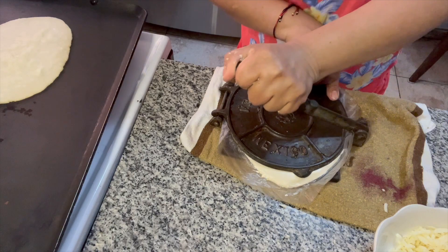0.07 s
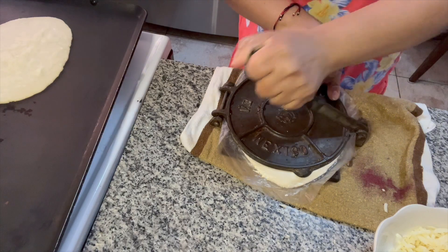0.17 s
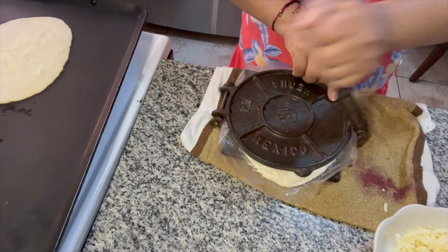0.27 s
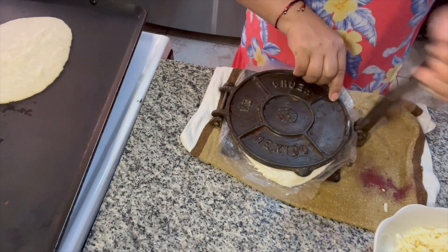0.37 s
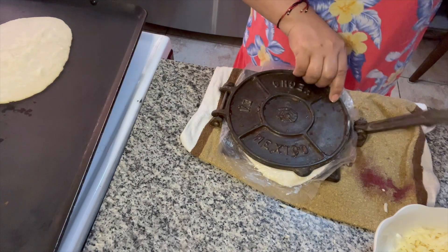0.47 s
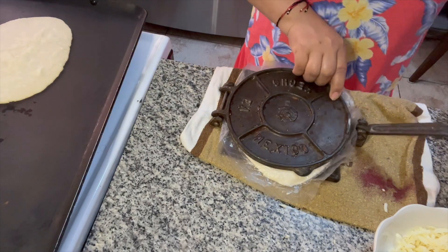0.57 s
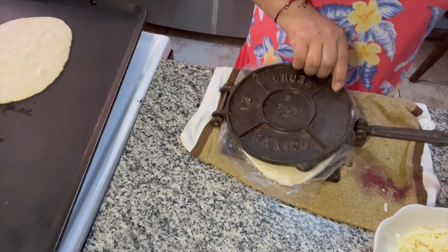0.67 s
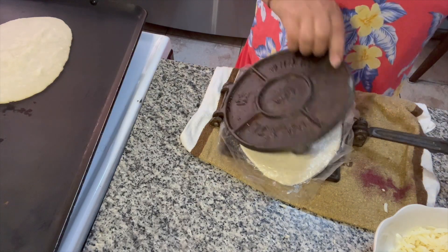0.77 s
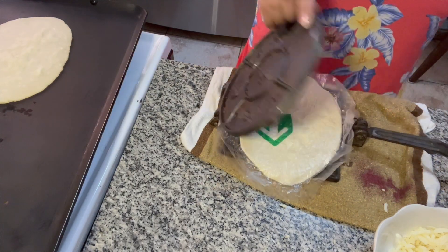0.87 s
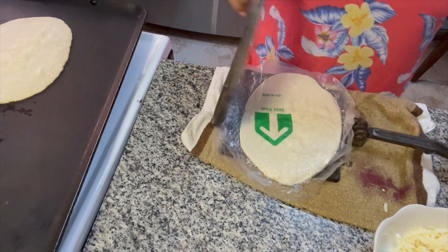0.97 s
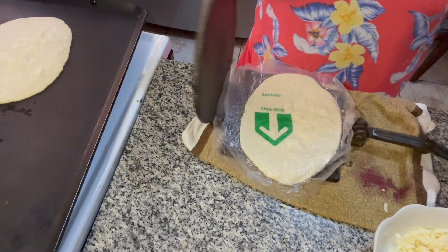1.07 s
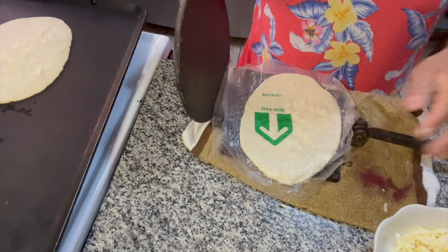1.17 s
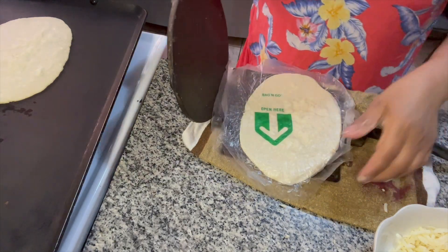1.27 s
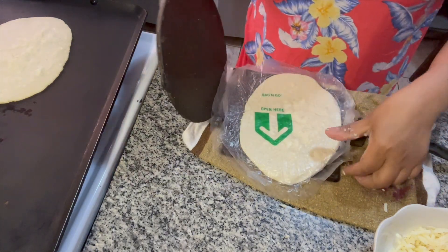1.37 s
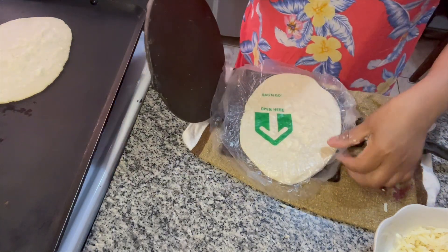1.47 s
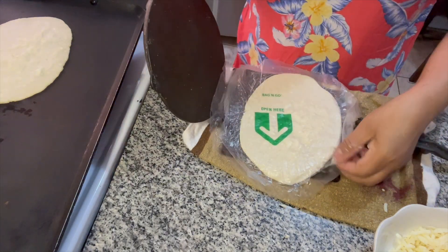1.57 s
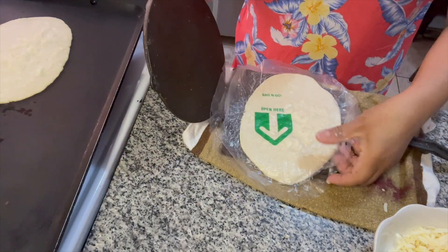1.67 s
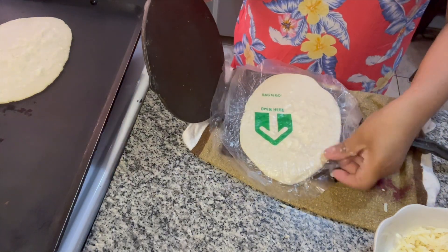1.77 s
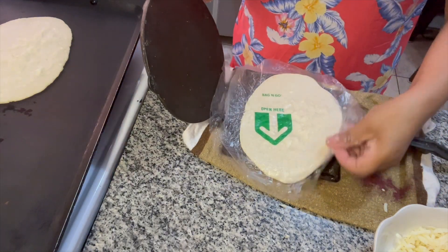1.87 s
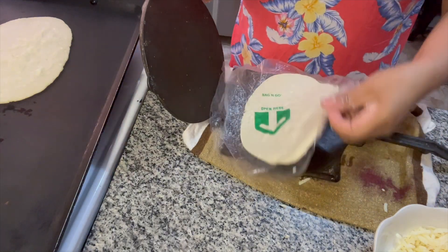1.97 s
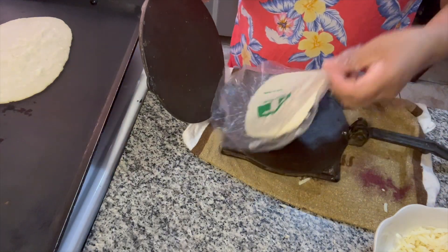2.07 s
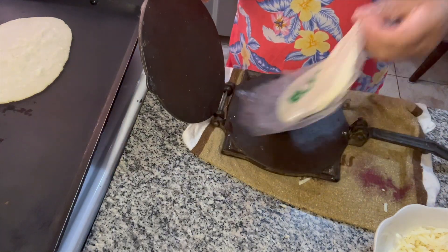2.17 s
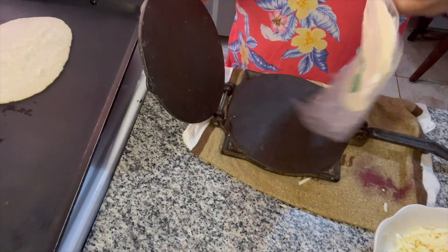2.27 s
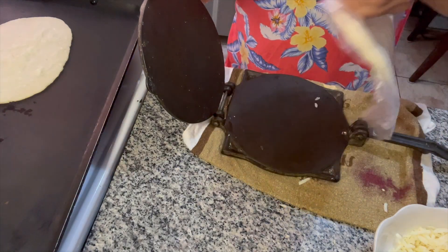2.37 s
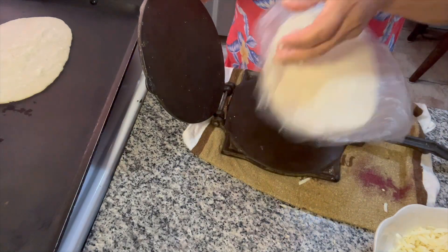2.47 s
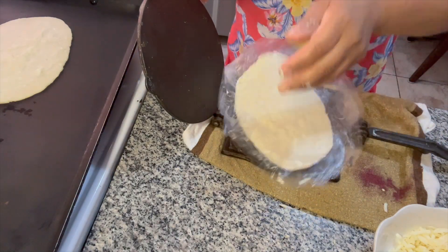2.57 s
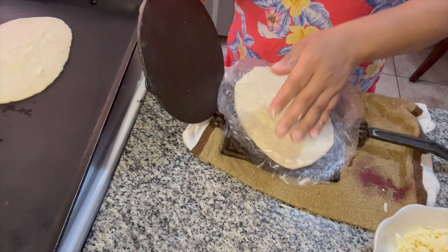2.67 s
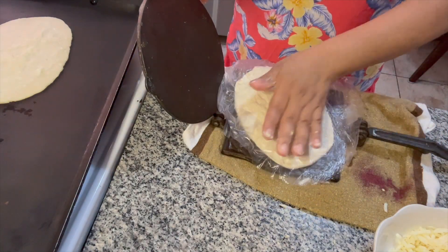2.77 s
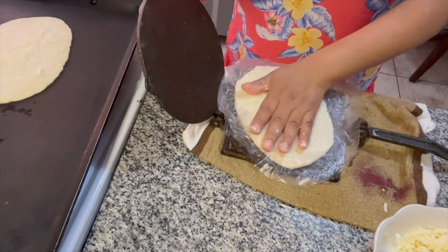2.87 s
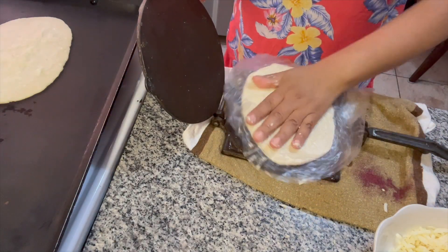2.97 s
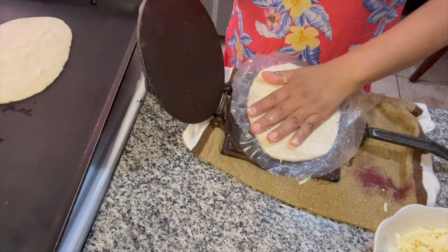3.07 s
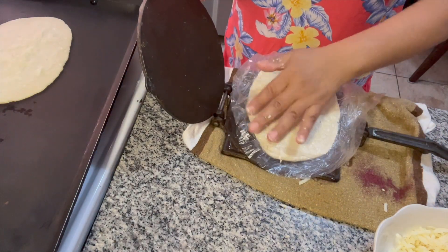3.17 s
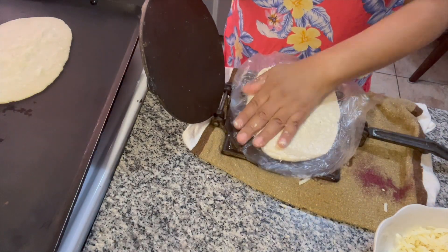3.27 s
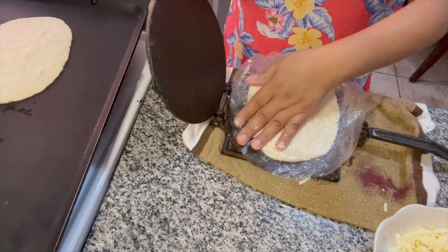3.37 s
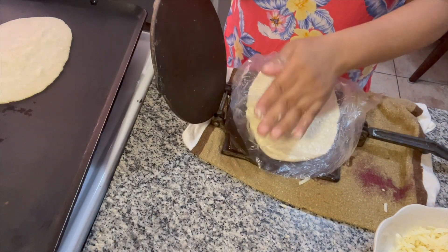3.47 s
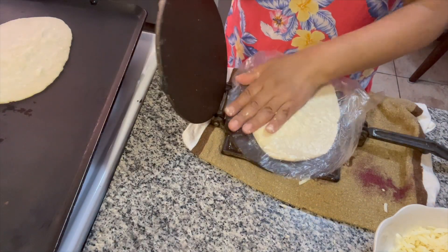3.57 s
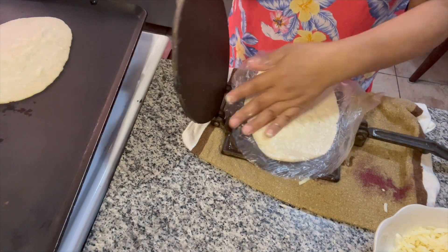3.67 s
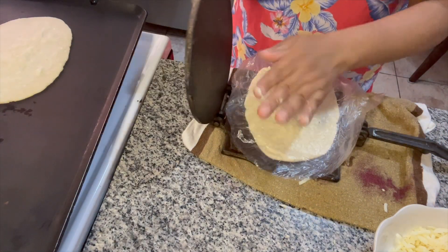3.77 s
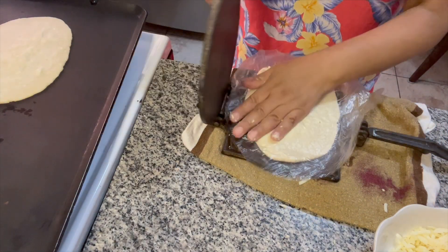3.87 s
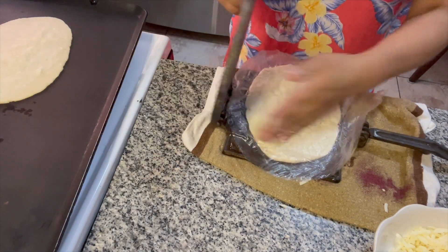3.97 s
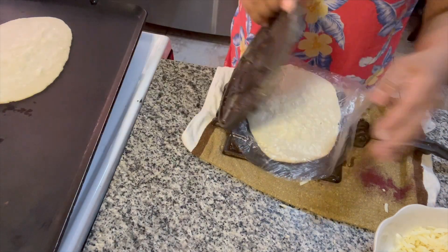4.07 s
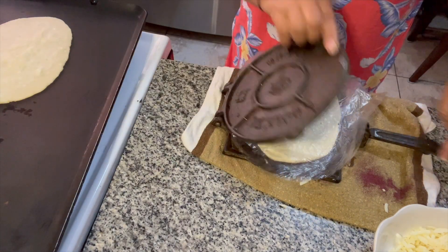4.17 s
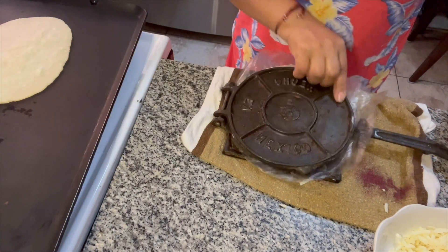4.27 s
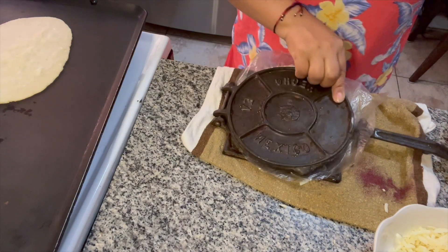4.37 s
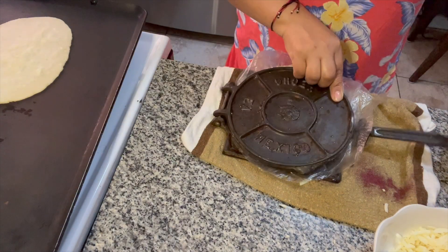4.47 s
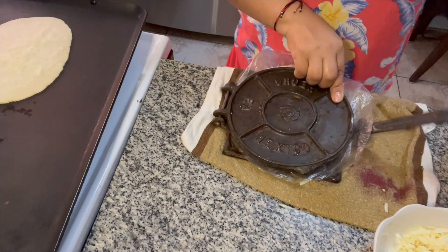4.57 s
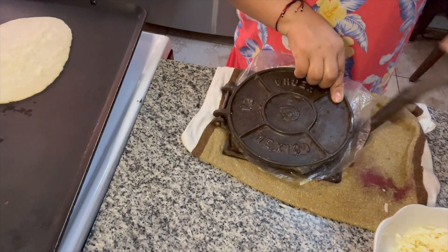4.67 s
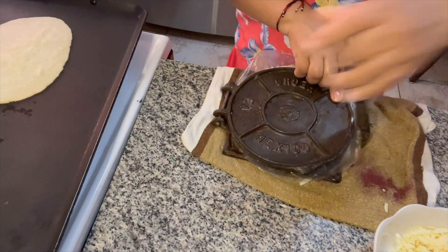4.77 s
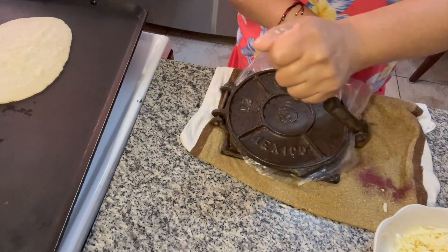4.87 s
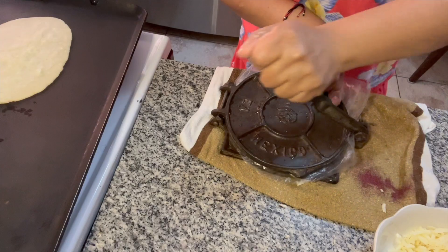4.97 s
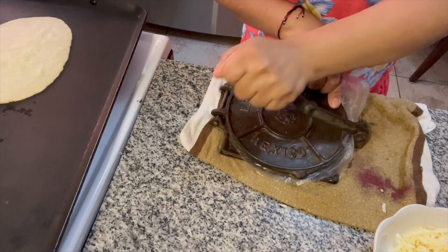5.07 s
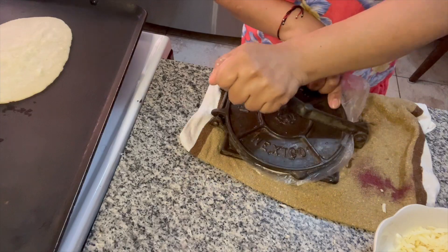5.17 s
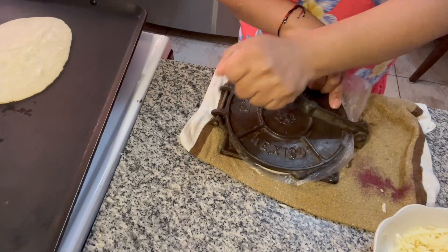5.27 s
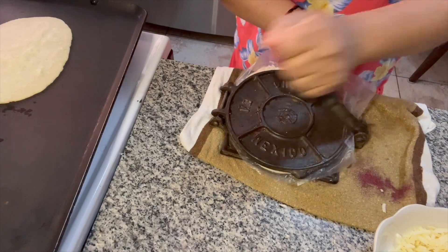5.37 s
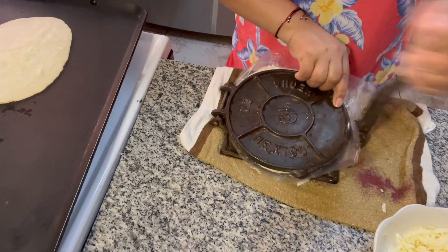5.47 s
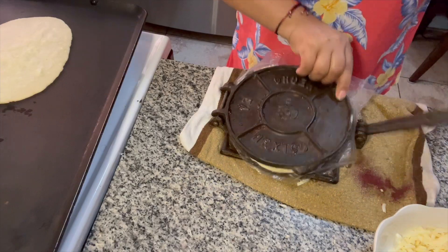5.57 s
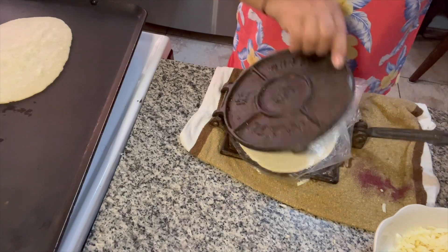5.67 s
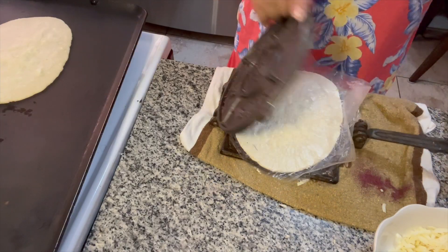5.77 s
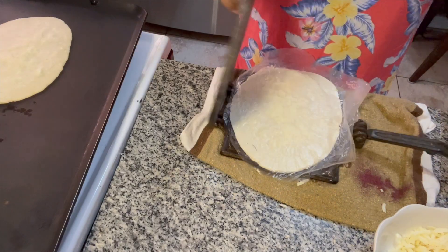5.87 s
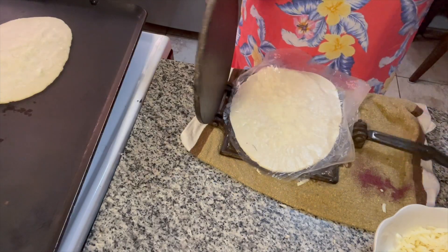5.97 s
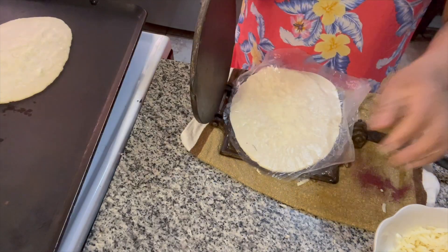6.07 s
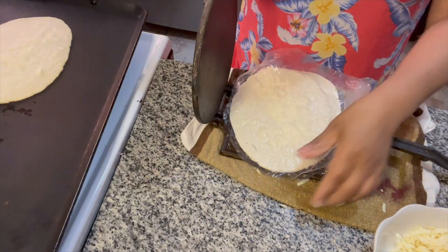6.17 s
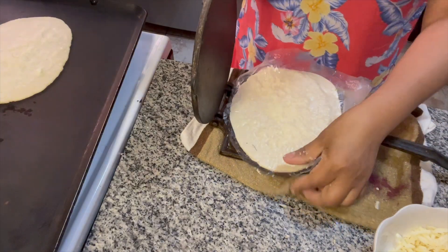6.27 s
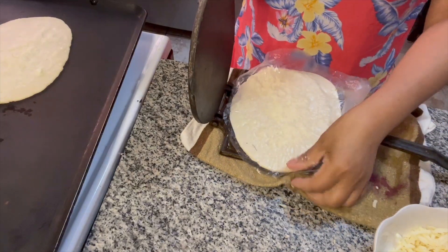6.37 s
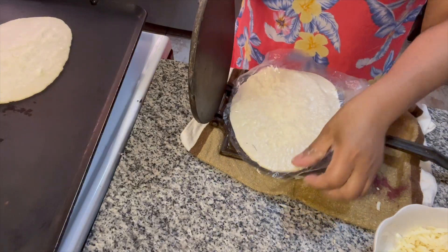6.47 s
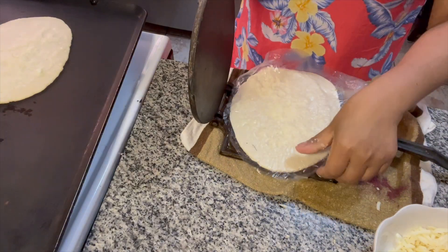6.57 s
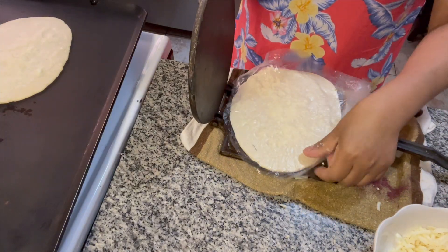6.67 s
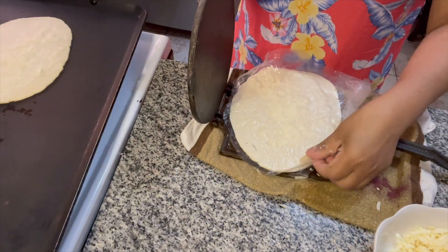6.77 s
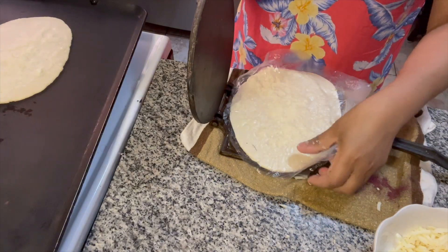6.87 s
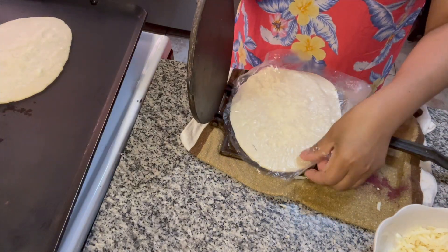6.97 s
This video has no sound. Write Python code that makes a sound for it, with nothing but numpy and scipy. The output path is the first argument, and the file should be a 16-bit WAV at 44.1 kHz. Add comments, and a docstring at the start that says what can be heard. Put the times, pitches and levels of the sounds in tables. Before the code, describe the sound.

Close stereo pickup of iron on a towel-covered stone counter over a low house rumble. Light lever ticks lead to a short squeal and a double bang with a low wavering ring. Thin plastic rustles and peels; several muffled hand slaps grow heavier. Then iron clatters shut, a lever clinks hard, and after quieter ticks the lid squeaks and bangs open, leaving soft plastic crinkles.

```python
"""A cast-iron press on a towel over a stone counter, over the low rumble of a house and a rustling sheet.
First iron knocks, then a short squeak leading into two hard blows and chattering loose parts; plastic peels
off dough. Next a hand pats the dough on the plate. More knocks follow as the lever scrapes and plastic peels.
Last come a second squeak, more hard blows and crinkling plastic. Blows ring banks of dying sines;
rustle, peel and chatter are shaped, flickering noise; squeaks are overtone stacks. Two ports listen close by."""
import sys
import numpy as np
from scipy import signal
from scipy.fft import rfft, irfft, next_fast_len
from scipy.io import wavfile
from scipy.ndimage import uniform_filter1d

SR = 44100
rng = np.random.default_rng(int(sys.argv[2]) if len(sys.argv) > 2 else 0)


def wav_out(sig):
    """Save sig, one row per channel (or a flat mono array), as 16-bit PCM at SR to the path in sys.argv[1]."""
    wavfile.write(sys.argv[1], SR, np.round(np.clip(np.atleast_2d(sig).T, -1, 1) * 32767).astype(np.int16))


N = 310023  # length in samples, about 7 s


def gain_of(db):
    """Turn decibels into a plain gain."""
    return 10 ** (np.asarray(db) / 20)


def evened(x):
    """Scale to an average (rms) strength of 1."""
    return x / np.sqrt(np.mean(x ** 2) + 1e-20)


def smoothed(x, size):
    """Average over neighbours twice, for a slow random drift."""
    return uniform_filter1d(uniform_filter1d(x, size=size), size=size)


def read(points, hz):
    """Values between table points, straight on a log-frequency axis."""
    f, *values = np.transpose(points)
    return np.squeeze([np.interp(np.log(hz + 1), np.log(f + 1), v) for v in values])


def near(modes, hz, db_per_octave):
    """Where a blow lands favours the modes around one pitch; the others get weaker, in dB."""
    return -db_per_octave * abs(np.log2(np.array(modes)[:, 0] / hz))


def gesture(start, rise, hold, db, fade):
    """A gain that rises, holds and fades at a steady dB rate."""
    out, at = np.zeros(N), round(start * SR)
    t = np.arange(at, min(N, at + SR)) / SR - start
    fading = gain_of(db - fade * np.maximum(t - rise - hold, 0))
    out[at:][:len(t)] = np.clip(t / rise, 0, 1) ** 2 * fading
    return out


def grains(rate, spread_db, length, depth):
    """A flickering gain: random small contacts (rate per s) that die away over about length seconds."""
    happens = rng.random(N) < rate / SR
    strength = gain_of(spread_db * np.minimum(rng.exponential(1, N), 4))
    dying = signal.lfilter([1], [1, -np.exp(-1 / (length * SR))], happens * strength)
    return evened(1 + depth * dying)


def noise(spectrum, level_db, size, patchy_db):
    """Two unrelated noises with this spectrum, in drifting patches, under a level curve."""
    frames, hz = 4 * N // size + 5, np.fft.rfftfreq(size, 1 / SR)
    a, b, c, d, patches = rng.standard_normal((frames, len(hz), 5)).T
    patches = uniform_filter1d(patches, size=5, axis=0)
    patches = evened(uniform_filter1d(patches, size=5, axis=1))
    shape = gain_of(read(spectrum, hz)[:, None] + patchy_db * patches)
    z = np.array([a + 1j * b, c + 1j * d]) * shape
    sound = signal.istft(z, nperseg=size, noverlap=3 * size // 4)[1][:, :N]
    return gain_of(level_db) * evened(sound)


def rings(modes, rise):
    """One dying half-second sine a mode, swelling in over the rise time (s)."""
    hz, db, t60 = np.transpose(modes)[:, :, None]
    t = np.arange(SR // 2) / SR
    return gain_of(db - 60 * t / t60) * (1 - np.exp(-t / rise)) * np.sin(2 * np.pi * hz * t)


# low rumble of the house, its relative spectrum: pitch_hz [Hz], level_db [dB per Hz]
RUMBLE_SPECTRUM = [(15, -52.5), (25, -40), (36, -20.5), (54, 7), (129, -12), (146, -4), (209, -10),
                   (236, -12.5), (290, -16), (408, -11), (565, -44.5), (648, -20), (1500, -33),
                   (1950, -44.5), (3300, -120)]


def house_rumble():
    """Steady low noise that drifts slightly in color."""
    return noise(RUMBLE_SPECTRUM, -45.5, size=2048, patchy_db=1)


# how fast the room's echoes die: pitch_hz [Hz], t60_s [s to fall 60 dB]
KITCHEN_DECAY = [(80, 0.24), (300, 0.41), (1000, 0.47), (3000, 0.49), (8000, 0.37), (15000, 0.041)]


def kitchen(x):
    """Sparse echoes of random sign, one in every 20 samples, each band dying at its own speed."""
    taps = np.zeros((2, SR))
    at = np.arange(200, SR - 40, 20) + rng.integers(0, 20, (2, (SR - 240) // 20))
    np.put_along_axis(taps, at, rng.choice([-1., 1.], at.shape), 1)
    hz, t, z = signal.stft(taps, SR, nperseg=256)
    dying = gain_of(-60 * t / read(KITCHEN_DECAY, hz)[:, None])
    tail = signal.istft(z * dying, SR, nperseg=256)[1]
    return signal.fftconvolve(x, tail / np.linalg.norm(tail[0]), axes=1)[:, :N]


# tones of the stone counter, before hands or dough damp them: pitch_hz [Hz], level_db [dB], t60_s [s]
COUNTER_MODES = [(53, -16, 0.46), (73.3, 6.5, 0.47), (103.3, 6.5, 0.2), (149, -17.5, 0.13),
                 (203.5, 4, 0.12), (219.7, 4.5, 0.063), (239.2, 3.5, 0.15), (282.6, -3, 0.14),
                 (332, -19, 0.041), (437, -4, 0.27)]
# pushes of weight, and the low rumble shaken up by the two hardest clangs: start_s [s], rise_s [s],
# hold_s [s], deep_sway_db [dB], upper_shudder_db [dB], fade_db_per_s [dB per s]
COUNTER_SHAKES = [(0.392, 0.034, 0.022, -76, -53, 290), (0.517, 0.019, 0.018, -44, -51, 157),
                  (0.674, 0.046, 0.12, -44, -47, 303), (0.854, 0.089, .05, -64, -42, 300),
                  (1.01, 0.0099, 0.031, -20, -29, 203), (2.818, 0.068, 0.034, -27.5, -42.5, 70),
                  (3.253, 0.086, .005, -21.5, -30, 178), (4.517, 0.033, 0.034, -55, -40, 121),
                  (4.722, 0.21, .02, -37.5, -60, 219), (5.412, 0.024, 0.13, -59, -51.5, 91),
                  (5.606, 0.01, .005, -46.5, -38, 155), (5.756, 0.037, 0.099, -48, -54.5, 191.5),
                  (5.96, 0.016, 0.02, -40.5, -30, 185)]


def counter_shaking():
    """Pushes of weight and the hardest clangs: random force shakes the counter's quickly damped modes."""
    damped = gain_of(-60 * np.arange(SR // 2) / SR / 0.2)
    shake = rings(COUNTER_MODES, 0.0011) * damped

    def shaken(part):
        return evened(signal.oaconvolve(rng.standard_normal(N), part.sum(0))[:N])

    deep, upper = shaken(shake[:3]), shaken(shake[3:8])
    out = np.zeros(N)
    for start, rise, hold, deep_db, upper_db, fade in COUNTER_SHAKES:
        out += gesture(start, rise, hold, 0, fade) * (gain_of(deep_db) * deep + gain_of(upper_db) * upper)
    return out


# relative spectrum of the plastic sheet and faint hiss: pitch_hz [Hz], level_db [dB per Hz]
RUSTLE_SPECTRUM = [(150, 10.5), (500, 3), (1000, 3.5), (2000, 5), (3500, 3), (5500, 4), (8000, 6),
                   (11000, 3), (14000, 0), (15700, -4), (16000, -46)]
# each swell of rustle or faint hiss: start_s [s], rise_s [s], hold_s [s], level_db [dB],
# fade_db_per_s [dB per s]
RUSTLE_SWELLS = [(0.0, 0.00066, 0.07, -56, 200), (0.105, 0.074, .005, -54.5, 48),
                 (0.422, 0.018, 0.23, -60.5, 50), (0.887, 0.06, 0.023, -65, 152),
                 (1.398, .012, 0.034, -60, 111), (1.477, 0.0078, .12, -49, 139),
                 (1.65, 0.05, 0.035, -51, 98), (1.746, 0.012, .003, -49.5, 169),
                 (1.817, 0.014, .003, -46.5, 68), (1.96, 0.044, 0.72, -56, 153),
                 (2.373, 0.038, 0.086, -44, 248), (2.544, 0.0049, 0.034, -35, 296),
                 (2.598, 0.0074, .004, -40, 251), (2.827, 0.0077, .003, -49, 250),
                 (2.845, 0.077, 0.12, -51, 84), (3.26, 0.0096, 0.0073, -42.5, 70),
                 (3.385, 0.038, .003, -46.5, 296), (3.549, 0.011, 0.0083, -37, 185),
                 (3.69, 0.013, 0.0027, -49, 251), (3.838, 0.0035, 0.005, -31, 222),
                 (4.048, 0.034, 0.0033, -56.5, 248.5), (4.11, 0.02, .003, -58, 16),
                 (4.256, 0.0055, 0.065, -48, 250), (4.56, 0.015, 0.0048, -44, 398),
                 (4.63, 0.0065, 0.38, -65, 100), (4.83, 0.004, 0.11, -54.5, 146),
                 (4.975, 0.029, 0.0025, -51, 72), (5.298, 0.031, 0.19, -61.5, 1),
                 (6.287, 0.015, 0.0016, -54.5, 161), (6.531, 0.04, 0.0033, -48, 156.5),
                 (6.657, 0.01, 0.11, -51, 186), (6.695, 0.024, 0.0035, -45, 396),
                 (6.797, 0.016, 0.039, -54.5, 500), (6.858, 0.013, 0.1, -57, 65)]
HISS_DB = -69  # steady faint hiss under the rustling, before the noise's own level


def sheet():
    """Dense soft crinkles over a faint hiss: noise that flickers in grains of a few milliseconds."""
    power = gain_of(HISS_DB) ** 2 + sum(gesture(*row) ** 2 for row in RUSTLE_SWELLS)
    rustle = noise(RUSTLE_SPECTRUM, 6.57, size=256, patchy_db=-2.5)
    return np.sqrt(power) * rustle * grains(100, 2.2, 0.0012, 0.42)


# relative spectrum of plastic leaving dough: pitch_hz [Hz], level_db [dB per Hz]
PEEL_SPECTRUM = [(600, -24), (1200, -11.5), (1900, -7.5), (2600, -19), (3200, -12.5), (5000, -31),
                 (8000, -45)]
# each peel: start_s [s], rise_s [s], hold_s [s], level_db [dB], fade_db_per_s [dB per s]
PEEL_MOVES = [(1.507, 0.038, 0.036, -51, 155), (1.82, 0.017, 0.052, -46.5, 91),
              (4.956, 0.026, 0.08, -43.5, 148)]


def peeling():
    """Plastic lets go of the dough in small snaps: noise broken into crackling grains."""
    level = sum(gesture(*row) for row in PEEL_MOVES)
    return level * noise(PEEL_SPECTRUM, 0, size=256, patchy_db=3) * grains(120, 2.5, 0.004, 1.5)


# relative spectrum of loose iron parts: pitch_hz [Hz], level_db [dB per Hz]
CHATTER_SPECTRUM = [(300, 3), (600, -0.5), (1000, 5), (1400, -2), (1750, -2), (2050, 7), (2700, -13.5),
                    (4000, -15.5), (8000, -12), (16000, -45)]
# parts set chattering in their hinges: start_s [s], hold_s [s], level_db [dB], fade_db_per_s [dB per s]
LOOSE_RATTLES = [(1.023, 0.028, -24, 296), (1.067, 0.0041, -21, 402), (4.253, 0.0074, -37, 600),
                 (4.27, 0.0042, -29, 352), (4.336, 0.0098, -44.5, 215), (4.379, 0.016, -55, 253),
                 (4.798, .02, -37.5, 399), (4.821, 0.017, -32.5, 253), (4.988, 0.025, -47, 193),
                 (5.073, 0.0036, -46, 448), (5.37, 0.017, -49, 195), (5.572, 0.042, -47, 193),
                 (5.597, 0.014, -46, 229), (5.96, 0.041, -21, 187)]
RATTLE_RISE_S = 0.0006
SETTLE_DB, SETTLE_DB_PER_S = -23, 75  # a weaker, slower tail: level against the chatter, fade


def rattle():
    """A dense rough chatter of iron, strongest in the middle range, settling in a slower tail."""
    level = np.zeros(N)
    for start, hold, db, fade in LOOSE_RATTLES:
        level += gesture(start, RATTLE_RISE_S, hold, db, fade)
        level += gesture(start, RATTLE_RISE_S, 0, db + SETTLE_DB, SETTLE_DB_PER_S)
    return level * noise(CHATTER_SPECTRUM, 1.2, size=256, patchy_db=1) * grains(400, 1, 0.0013, 0.15)


# relative spectrum of the shaking lid: pitch_hz [Hz], level_db [dB per Hz]
CLATTER_SPECTRUM = [(400, -9.5), (600, 1), (950, 5), (1150, 0.5), (1350, 6.5), (1750, 2), (2300, -2.5),
                    (2900, -14.5), (5000, -40)]
# the whole lid shakes on its hinge pin around the hard knocks:
# start_s [s], rise_s [s], hold_s [s], level_db [dB], fade_db_per_s [dB per s]
LID_SHAKES = [(1.001, 0.011, 0.085, -22.5, 250), (4.28, 0.0086, 0.021, -41, 280),
              (4.381, .015, 0.019, -36.5, 255), (5.974, 0.012, 0.12, -41, 148)]


def lid_shaking():
    """The lid shaking on its pin: a full, dense clatter in the middle range."""
    level = sum(gesture(*row) for row in LID_SHAKES)
    return level * noise(CLATTER_SPECTRUM, 0, size=256, patchy_db=1) * grains(800, 1, 0.002, .2)


# tones of the lid's hinge pin: pitch_hz [Hz], level_db [dB], t60_s [s]
PIN_MODES = [(980, -14, .12), (1830, 0, .13), (1960, -2, .04), (3080, -4, .07), (3200, -6, .03),
             (3400, -9, .04), (3650, -6, .06), (4530, -11, .05), (4820, -9, .05), (5070, -5, .05)]
# the pin clicks in its seat: start_s [s], level_db [dB], favoured_pitch_hz [Hz],
# narrowness_db_per_octave [dB per octave]
PIN_SEAT_CLICKS = [(4.099, -25, 3200, 16), (4.133, -32, 1900, 3), (0.455, -52, 1850, 20),
                   (0.727, -52, 1850, 25), (0.767, -52, 1850, 25)]


def pin():
    """Each click of the pin in its seat wakes the tones around one pitch: clean short chimes."""
    out, modes = np.zeros(N + SR), rings(PIN_MODES, 0.0007)
    for start, db, hz, narrow in PIN_SEAT_CLICKS:
        out[round(start * SR):][:SR // 2] += gain_of(db + near(PIN_MODES, hz, narrow)) @ modes
    return out[:N]


# dry pivots squeak as lid or lever swings: start_s [s], rise_s [s], hold_s [s], level_db [dB],
# fade_db_per_s [dB per s], slip_rate_hz [Hz], overtone_step_db [dB per overtone]
PIVOT_SQUEAKS = [(0.984, 0.022, 0.00093, -32.5, 2000, 1085, -4), (5.94, 0.019, 0.0043, -21, 1996, 1212, -1)]
SLIP_JITTER = .75  # weight of the pitch wobble, before averaging shrinks it to about 5 %
SLIP_ROUGH = .7  # rms share of rough loudness flicker


def squeaks():
    """A dry pivot slips quickly and a little unevenly: a short stack of overtones."""
    wobble = 1 + SLIP_JITTER * uniform_filter1d(rng.standard_normal(N), size=200)
    rough = evened(uniform_filter1d(rng.standard_normal(N), size=40))
    out = np.zeros(N)
    for *shape, hz, step_db in PIVOT_SQUEAKS:
        start = round(shape[0] * SR)
        at = slice(start, start + SR // 4)
        turns = np.cumsum(hz * wobble[at]) / SR
        stack = sum(gain_of(step_db * k) * np.sin(2 * np.pi * (k + 1) * turns) for k in range(6))
        out[at] += gesture(*shape)[at] * evened(stack * (1 + SLIP_ROUGH * rough[at]))
    return out


# tones of the gripped iron lever, before extra damping: pitch_hz [Hz], level_db [dB], t60_s [s]
LEVER_MODES = [(720, -5, .025), (990, -2, .022), (1230, -3, .022), (1400, 4, .024), (1930, -5, .03),
               (2085, 3, .018), (2270, -4, .02), (2565, -4, .017), (3010, 4, .02), (3365, -4, .015),
               (3520, -2, .018), (4460, -1, .018), (4840, -8, .015), (6280, -6, .014)]
# the lever slides on iron: start_s [s], rise_s [s], hold_s [s], level_db [dB], fade_db_per_s [dB per s],
# favoured_pitch_hz [Hz], narrowness_db_per_octave [dB per octave]
LEVER_SCRAPES = [(4.337, .003, .02, -37, 399, 1400, 33), (4.821, .002, 0.013, -28, 296, 2640, 3.5),
                 (5.363, .004, 0.028, -53, 300, 1200, 14), (5.553, .003, 0.016, -47, 248, 1900, 60),
                 (5.6, .003, 0.016, -49.5, 300.5, 2000, 63), (5.657, .02, 0.034, -57, 299.5, 1930, 61.5)]
FREE_RING = 3.5  # a sliding lever rings this many times longer than a gripped one


def scraping():
    """Gritty friction drives the lever's modes, so the sliding lever sings."""
    free = rings([(hz, db, FREE_RING * t60) for hz, db, t60 in LEVER_MODES], 0.00069)[:, :SR // 5]
    out = np.zeros(N + SR)
    for *shape, hz, narrow in LEVER_SCRAPES:
        start = round(shape[0] * SR)
        at = slice(start, start + SR // 3)
        ring = gain_of(near(LEVER_MODES, hz, narrow)) @ free
        grit = rng.standard_normal(SR // 3) * gesture(*shape)[at]
        out[at] += signal.oaconvolve(grit, ring / np.linalg.norm(ring))[:SR // 3]
    return out[:N]


# bounces that feed the lid's deepest tone: start_s [s], hold_s [s], level_db [dB],
# hand_damping_db_per_s [dB per s], lingering_part_db [dB]
LID_BOUNCES = [(0.213, 0.0022, -34, 898, -53.5), (0.773, 0.003, -38.5, 721, -57.5),
               (1.017, 0.075, -16, 412, -35), (3.567, 0.0019, -25, 267, -56),
               (3.849, 0.0035, -29, 179, -48), (4.143, 0.032, -37, 295, -56.5),
               (4.266, 0.044, -25.5, 362, -52.5), (4.355, 0.0085, -34.5, 350, -57),
               (4.4, 0.012, -33, 350, -61.5), (4.473, 0.0032, -45, 352, -65),
               (5.362, 0.0042, -33, 900, -74), (5.961, 0.056, -17, 413, -35)]
# tones that linger with the deepest one: pitch_hz [Hz], level_db [dB]
COMPANION_TONES = [(243, -12.5), (286, -5.5), (462, -8), (1095, -27), (1222, -16)]
LID_HZ, LID_RISE_S = 377, 0.0053
LID_WAVER_HZ, LID_WAVER_DB = 4, 2  # rms drift of pitch and loudness as the lid rocks
LINGER_DB_PER_S = 41.5  # a fainter part of each ring escapes the hand


def lid_tone():
    """A low ring that wavers as the lid rocks, sent louder to the left where the lid stands."""
    struck, linger = np.zeros(N), np.zeros(N)
    for start, hold, db, fade, linger_db in LID_BOUNCES:
        struck += gesture(start, LID_RISE_S, hold, db, fade)
        linger += gesture(start, LID_RISE_S, 0, linger_db, LINGER_DB_PER_S)
    pitch, swell = (evened(smoothed(v, 900)) for v in rng.standard_normal((2, N)))
    turns = np.cumsum(LID_HZ + LID_WAVER_HZ * pitch) / SR
    deepest = (struck + linger) * gain_of(LID_WAVER_DB * swell) * np.sin(2 * np.pi * turns)
    t = np.arange(N) / SR
    others = sum(gain_of(db) * np.sin(2 * np.pi * hz * t) for hz, db in COMPANION_TONES)
    return gain_of([[4.5], [-1.5]]) * (deepest + linger * others)


# tones of the lid, before extra damping: pitch_hz [Hz], level_db [dB], t60_s [s]
LID_MODES = [(633, -6, .15), (872, -7, .35), (1095, -6, .4), (1222, -8, .4), (1710, -12, .15),
             (2240, -10, .2), (4888, -13, .12), (7914, -5, .25), (9061, -6, .22), (10150, -4, .2),
             (11348, -6, .18), (12455, -8, .17)]
CLINK_TO_ROOM_DB = -9  # the small parts throw little sound into the room
THUD_DELAY_S = 0.00381  # the towel passes the blow on to the counter late
CATCH_SPREAD_DB = 2  # how unevenly a blow catches the modes


def blows(table, crack_t60, edge_hz, lag, damping, clinking, narrowest):
    """Each blow cracks and rings counter, lid and a clinking part; returns near sound and room feed."""
    muffled = gain_of(-damping * np.arange(SR // 2) / SR)  # the ringing is soaked up, dB per s
    delay = round(THUD_DELAY_S * SR)
    thud = np.pad(rings(COUNTER_MODES, 0.011), ((0, 0), (delay, 0)))[:, :SR // 2]
    bodies = [muffled * thud, muffled * rings(LID_MODES, 0.006), muffled * rings(clinking, 0.00033)]
    out, t = np.zeros((2, 2, N + SR)), np.arange(2048) / SR
    body_band = signal.butter(2, [500, 3000], "bandpass", fs=SR)
    edge_band = signal.butter(2, [4200, edge_hz], "bandpass", fs=SR)
    for start, crack_db, thud_db, lid_db, clink_db, bright_db, pan_db, thud_hz, clink_hz, contact in table:
        focus = np.clip(16 - clink_db, 9, narrowest)  # harder clinks wake more modes, dB per octave
        thud_levels = thud_db + near(COUNTER_MODES, thud_hz, 9)
        clink_levels = clink_db + near(clinking, clink_hz, focus)
        sound = 0  # two rows: near sound, room feed
        for body, db, sent_db in zip(bodies, (thud_levels, lid_db, clink_levels), (0, 0, CLINK_TO_ROOM_DB)):
            caught = gain_of(db + CATCH_SPREAD_DB * rng.standard_normal(len(body)))
            sound = sound + gain_of([[0], [sent_db]]) * (caught @ body)
        burst = rng.standard_normal(len(t)) * gain_of(crack_db - 60 * t / crack_t60)
        edge = gain_of(bright_db) * signal.lfilter(*edge_band, burst)
        sound[:, :len(t)] += signal.lfilter(*body_band, burst) - edge
        sound[:, :len(t)] *= (1 - np.exp(-t / contact)) ** 2  # a longer contact softens the edge
        for side, at in enumerate((round(start * SR), round((start + lag) * SR))):  # right comes later
            out[:, side, at:at + sound.shape[1]] += gain_of(pan_db * (1.5 - side)) * sound
    return out[..., :N]


# tones of the dough-covered plate under a palm, before extra damping:
# pitch_hz [Hz], level_db [dB], t60_s [s]
SLAP_MODES = [(800, 3, .014), (550, -6, .02), (950, 0, .016), (1250, 0, .014), (1900, -1, .012),
              (2750, -5, .009), (3300, -3, .01), (5000, -5, .004)]
# hand and sheet slapped on the plate: start_s [s], crack_db [dB], thud_db [dB], lid_chime_db [dB],
# plate_slap_db [dB], brightness_db [dB], left_minus_right_db [dB, before the ports],
# thud_centre_hz [Hz], slap_centre_hz [Hz], contact_s [s]
DOUGH_PATS = [(2.548, -17.5, -38, -75, -48, -8, 1.5, 96, 2090, 0.0012),
              (2.614, -20.5, -33.5, -75, -14, -34.5, 1.5, 191, 1540, 0.0013),
              (2.839, -48, -49, -88, -45, 18, 1.8, 72.7, 3620, 0.0013),
              (3.274, -13, -30, -54, -17.5, -4, 0.62, 81, 805, 0.001),
              (3.348, -38, -16.5, -81, -30, -15, 1.1, 71.6, 1800, 0.001),
              (3.433, -37.5, -22, -70, -18, 27.5, 1.2, 61.9, 1940, 0.0062),
              (3.56, -5, -11, -74, -1.5, 2, 0.34, 159, 1280, 0.0026),
              (3.711, -48, -52, -74, -65, 21, 4, 125, 1960, 0.0013),
              (3.844, 1.5, -2, -37, -16, -11, 0.63, 164, 785, 0.0025)]


def dough_pats():
    """A palm slaps the covered plate: dull, quickly damped blows, as dough and palm soak up the ringing."""
    return blows(DOUGH_PATS, crack_t60=0.024, edge_hz=13600, lag=.00009, damping=175,
                 clinking=SLAP_MODES, narrowest=7.6)


# iron on iron: start_s [s], crack_db [dB], thud_db [dB], lid_chime_db [dB], lever_clink_db [dB],
# brightness_db [dB], left_minus_right_db [dB, before the ports], thud_centre_hz [Hz],
# clink_centre_hz [Hz], contact_s [s]
IRON_KNOCKS = [(0.214, -22, -38.5, -63, -30, -6, -1.5, 61.9, 2070, 0.00037),
               (0.266, -33, -42, -119, -25, -18, 1, 183, 775, 0.00061),
               (0.321, -31, -44.5, -89, -39, -20, -2, 302, 2080, 0.0011),
               (0.421, -62, -39, -74, -32.5, -14, -3, 103, 2100, 0.00038),
               (0.456, -37, -37.5, -82, -40, -26, 4, 189, 1940, 0.00029),
               (0.676, -55, -59, -80, -38, -20, 0.5, 200, 2140, 0.0012),
               (0.724, -36, -38, -70, -25.5, -22, 1, 271, 860, 0.00042),
               (0.767, -33.5, -35.5, -66, -25, -26, 3.5, 228, 790, 0.0024),
               (0.901, -34, -60, -70, -29, -39, 7.5, 217, 1670, 0.0029),
               (1.013, -2.5, -6, -20.5, -1.5, -10, -2.5, 217, 960, 0.0001),
               (1.030, -15.5, -19, -41, -17, -37, -4.5, 116, 930, 0.00084),
               (1.070, -0.5, -8.5, -21, -10.5, -8.5, -3, 226, 2320, 0.00032),
               (4.099, -23, -50, -73, -39, -30, 12.5, 133, 3250, 0.011),
               (4.133, -20, -32, -69, -50, -12, -3.5, 294, 1890, 0.00041),
               (4.262, -4, -23.5, -43, -14, -2.5, 3.5, 290, 1990, 0.0033),
               (4.293, -12, -26.5, -60, -17.5, -31, 0.5, 210, 1400, 0.0011),
               (4.342, -26, -29.5, -61, -4.5, -17, -0.5, 82.6, 1960, 0.0025),
               (4.541, -21.5, -55.5, -41.5, -6, -8.5, -14, 192, 720, 0.0051),
               (4.577, -13, -58, -61.5, -25, -54, 1.5, 68, 1980, 0.0028),
               (4.658, -54.5, -31, -69, -36.5, -16, 1.5, 192, 1400, 0.0023),
               (4.712, -37.5, -22.5, -42, -14.5, -24, -2, 113, 1860, 0.002),
               (4.763, -17.5, -22, -47, -20.5, -25, -1, 205, 1280, 0.0016),
               (4.800, -37, -34, -68, -40, -31, 6.5, 205, 1380, 0.00068),
               (4.822, 6, -22.5, -85, 5.5, -10.5, 0.5, 202.5, 1907, 0.0032),
               (5.363, -26.5, -30, -89, -27, -35, 2, 223, 1790, 0.0011),
               (5.524, -34, -62.5, -87.5, -42, -12, 2.5, 62, 1380, 0.0019),
               (5.562, -52, -48, -86, -46, 1.5, 8.5, 115.5, 1930, 0.00098),
               (5.605, -42, -58, -79, -31, 2.5, 6.5, 214, 1930, 0.0018),
               (5.893, -25, -62, -90.5, -22.5, -29, -10, 61.9, 703, 0.0015),
               (5.963, -0.5, -12.5, -25, -11.5, -5.5, 2.5, 228, 1980, 0.0017),
               (5.975, -27, -23, -60, -28, -8, -6.5, 106.5, 900, 0.0018),
               (6.016, 6, -20.5, -24.5, -17, -8, -2.5, 106, 1030, 0.0044)]


def iron_knocks():
    """Iron strikes iron: a sharp crack, with lid, lever and counter ringing after it."""
    return blows(IRON_KNOCKS, crack_t60=0.022, edge_hz=12400, lag=.00007, damping=130,
                 clinking=LEVER_MODES, narrowest=41)


def scene():
    """Add all sources and the room's answer to blows and pivots."""
    knocks, knocks_sent = iron_knocks()
    pats, pats_sent = dough_pats()
    pivots = squeaks() + scraping()
    room = gain_of(-5.5) * kitchen(knocks_sent + pats_sent + gain_of(CLINK_TO_ROOM_DB) * pivots)
    background = house_rumble() + room + counter_shaking() + sheet() + peeling()
    loose_parts = rattle() + lid_shaking() + pin() + pivots
    return background + loose_parts + lid_tone() + pats + knocks


# the pair of ports: pitch_hz [Hz], likeness [0-1], right_leads_rad [radians], left_minus_right_db [dB]
PORT_PAIR = [(60, .97, 0, 2.5), (150, .95, 0, 2.5), (270, .75, 0, 3), (500, .1, 0, 1), (1000, .05, 0, 1),
             (2000, 0, 0, 1), (3000, .3, .3, 2), (5000, .35, 1.4, 4), (6500, .6, 2.6, 2),
             (7500, .97, 3.1, 0), (8600, .95, 3.4, 0), (9600, .8, 4.8, 0), (10700, 1, 6.2, 0),
             (12300, 1, 6.4, 0), (13300, .65, 7.7, 0), (14400, 1, 9.4, 0), (17000, 1, 9.4, 0)]
EDGE_HZ = 16600  # treble above this is cut


def record(dry):
    """The ports share the bass and, with a phase shift, the treble; the deepest bass is cut."""
    size = next_fast_len(N + SR)
    left, right = rfft(dry, size)
    same, lead, tilt_db = read(PORT_PAIR, np.fft.rfftfreq(size, 1 / SR))
    same = np.clip(same, 0, 1)
    shared = same * np.exp(1j * lead) * left
    right = shared + 1j * np.sqrt(1 - same ** 2) * right  # a quarter turn keeps the power
    tilted = np.array([left * gain_of(tilt_db / 2), right / gain_of(tilt_db / 2)])
    ports = irfft(tilted, size)[:, :N]
    ports = signal.sosfilt(signal.butter(3, 45, "highpass", fs=SR, output="sos"), ports)
    ports = np.tanh(.75 * ports) / .75  # the loudest peaks are rounded off
    treble_cut = signal.firwin(511, EDGE_HZ, window=("kaiser", 9), fs=SR)
    return signal.oaconvolve(ports, treble_cut[None], "same")


dry = scene()
out = record(dry)
wav_out(out)
```